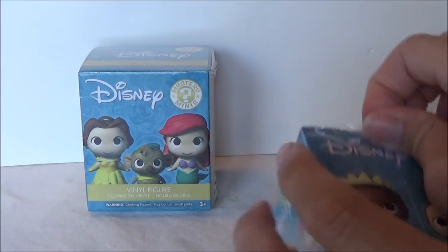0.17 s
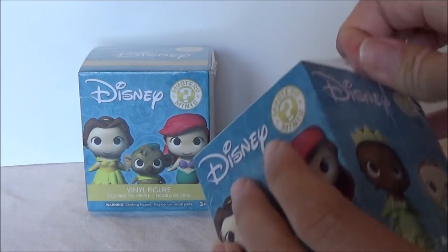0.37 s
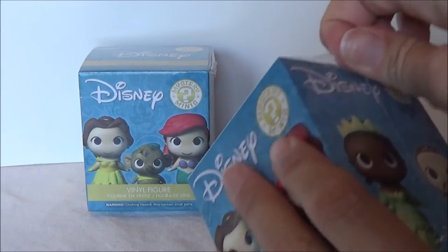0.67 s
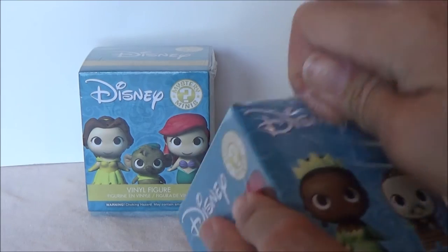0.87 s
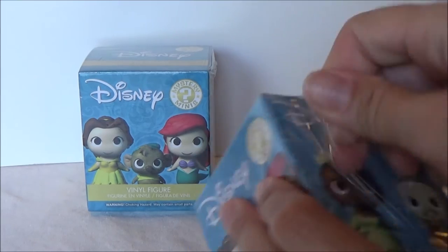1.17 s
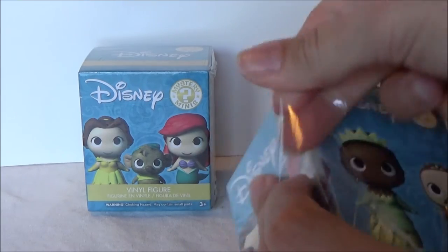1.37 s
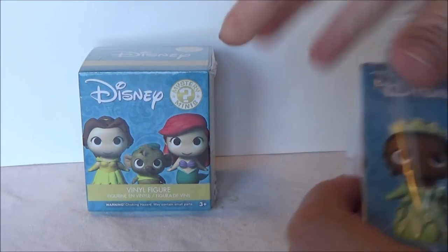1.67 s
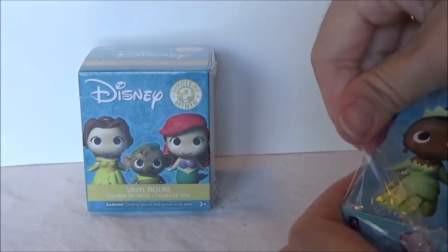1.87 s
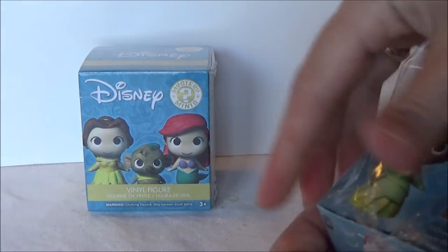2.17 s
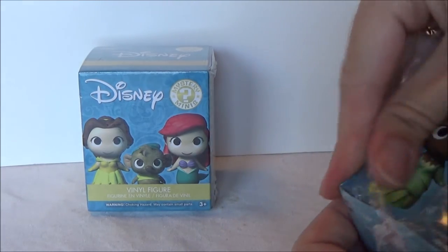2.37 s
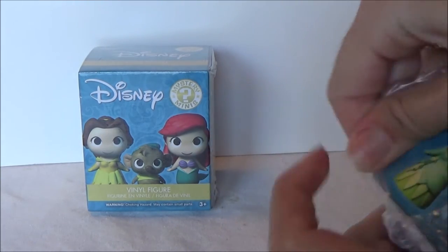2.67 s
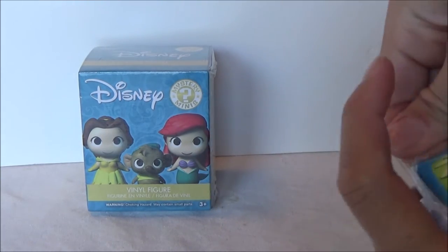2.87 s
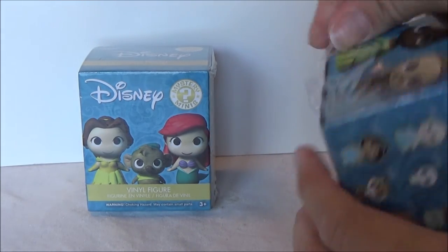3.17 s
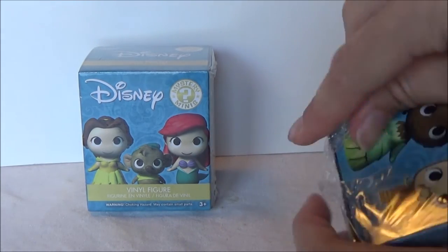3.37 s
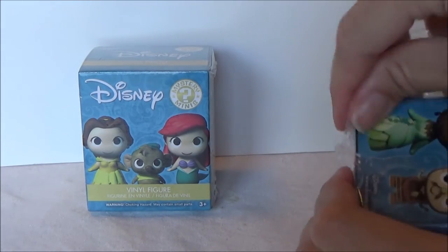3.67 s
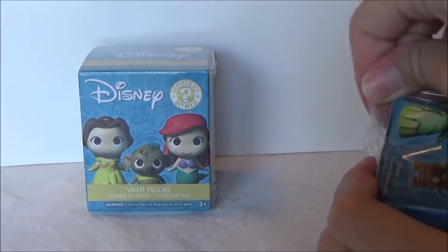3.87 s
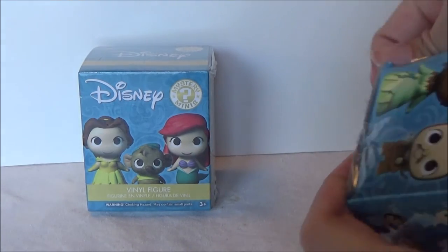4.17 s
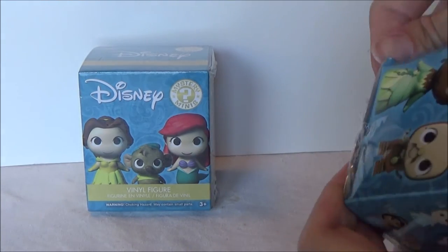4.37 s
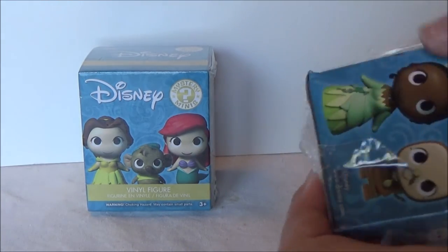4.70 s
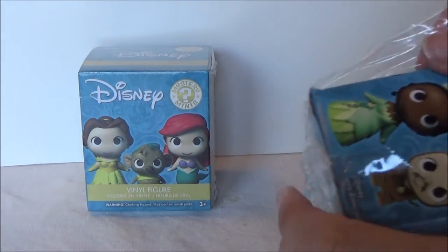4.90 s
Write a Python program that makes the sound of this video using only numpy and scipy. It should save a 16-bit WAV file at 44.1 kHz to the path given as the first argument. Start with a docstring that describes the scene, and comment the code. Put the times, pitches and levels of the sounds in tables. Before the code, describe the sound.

Close-up unwrapping: quiet fumbling and small squeaky scrapes first, then continual bright snaps and crinkles as plastic wrap is tugged, with tiny pauses between pulls. The light cardboard box pops and thumps hollowly now and then. Crackles stay busy and grow slightly stronger toward the end. Mostly dry sound, slightly right of centre, in a small still room with barely audible background hush.

```python
"""Peeling shrink wrap off a small box

Hands peel and crumple thin shrink wrap off a small cardboard box on a table, heard close by.
Each pull buckles creases: single sharp snaps are short noise bursts filtered at the pitch of the fold,
over a crackle of tiny ones made of noise with a random grain envelope.
The hollow box knocks as decaying tones and rubs as low grains; a few finger scrapes are rising hoarse tones.
The table top adds an early reflection, a small room adds a decaying noise tail, and faint hush lies below.
"""
import sys
import numpy as np
from scipy import signal
from scipy.fft import rfft, irfft, next_fast_len
from scipy.io import wavfile
from scipy.ndimage import uniform_filter1d, map_coordinates

SR = 44100
rng = np.random.default_rng(int(sys.argv[2]) if len(sys.argv) > 2 else 0)


def materialize(psi):
    """Save the field psi as 16-bit PCM at rate SR to the path in sys.argv[1].

    A 1-D psi becomes a single channel; in a 2-D psi each row is a channel.
    """
    bounded = np.clip(np.atleast_2d(psi).T, -1, 1)
    quanta = np.round(bounded * 32767).astype(np.int16)
    wavfile.write(sys.argv[1], SR, quanta)


N = 222296  # samples, about 5 s


def amp(db):
    """Level to amplitude: 20 dB are a factor of ten."""
    return 10 ** (np.asarray(db) / 20)


def unit(x):
    """Normalisation to an rms of 1."""
    return x / np.sqrt(np.mean(x ** 2) + 1e-20)


def along(points, hz):
    """Interpolation of (f/Hz, value) points on a logarithmic frequency axis."""
    f, v = np.transpose(points)
    return np.interp(np.log(hz + 1), np.log(f), v)


def filtered(x, response):
    """Linear filtering: the spectrum is multiplied by a response of frequency."""
    m = next_fast_len(N + SR // 2)
    spectrum = rfft(x, m) * response(np.fft.rfftfreq(m, 1 / SR))
    return irfft(spectrum, m)[..., :N]


def coloured(x, points):
    """Spectral shaping by (f/Hz, level/dB) points."""
    return filtered(x, lambda hz: amp(along(points, hz)))


def band_noise_filter(order, low_hz, high_hz):
    """Butterworth band-pass: maximally flat between two cutoffs, the upper kept below half the sample rate."""
    return signal.butter(order, [low_hz, min(high_hz, .45 * SR)], 'bandpass', fs=SR, output='sos')


def add(track, s, sound):
    """Superposition of a sound on a track from time s."""
    start = max(round(s * SR), 0)
    part = track[..., start:start + sound.shape[-1]]
    part += sound[..., :part.shape[-1]]


# difference between the two close microphone ports: f/Hz, gain of the side signal level/dB
PORT_WIDTH = [(200, -24.5), (600, -17), (1200, -13), (4000, -10), (9000, -8), (14000, -18.5)]


def ports(mid, side):
    """Spatial coherence: long waves reach both ports alike, short ones differ."""
    side = coloured(side, PORT_WIDTH)
    return np.array([mid + side, mid - side])


# typical time for the flutter to peak/ms, its scatter/natural log
FLUTTER_MS, FLUTTER_SCATTER = 0.52, 0.27
# creases whose snaps stand out from the crackle around them:
# t/s, relative level/dB, pitch of the fold f/Hz, treble sparkle over the fold level/dB
DISTINCT_CREASES = [(0.069, -21.5, 4600, 20), (0.2755, -25, 1870, -10), (0.3153, -19.5, 4500, 9),
                    (0.383, -23.5, 4340, -1.5), (0.5506, -28.5, 4030, 2), (0.5946, -24.5, 3820, 4),
                    (0.6271, -27.5, 4300, 0.5), (0.6394, -14, 4000, 8.5), (0.6791, -14, 4100, 9),
                    (0.7351, -16, 2480, 2), (0.8242, -32.5, 4100, 10.5), (0.8532, -10.5, 3400, 2.5),
                    (0.8666, -15.5, 3800, -1), (0.8967, -14.5, 4800, 3), (0.9268, -15.5, 3400, 17),
                    (0.9587, -16, 2800, 9.5), (0.9982, -18, 5050, 9), (1.095, -17.5, 4760, -6),
                    (1.1011, -16.5, 3900, 7), (1.1261, -11.5, 4100, -1.5), (1.1474, -11.5, 2850, 0),
                    (1.1663, -17, 3300, 9.5), (1.2071, -18, 2070, -7.5), (1.218, -10, 2130, -16),
                    (1.2254, -13.5, 2400, 8.5), (1.2472, -14, 2300, 23), (1.2648, -19, 3400, 8.5),
                    (1.3599, -19, 3300, 11.5), (1.4444, -19.5, 4530, 9), (1.461, -12, 2930, 10),
                    (1.477, -17.5, 3900, 5.5), (1.504, -16, 4370, 1), (1.5511, -19, 3660, -1.5),
                    (1.5585, -22.5, 3600, 12.5), (1.5856, -21.5, 3730, -10.5), (1.6143, -12.5, 4050, 2),
                    (1.637, -18.5, 3690, 0), (1.6408, -19, 4100, 6.5), (1.6813, -21, 3400, 9.5),
                    (1.723, -16.5, 4800, 3), (1.748, -21, 3340, -11), (1.7788, -15, 4430, -5),
                    (1.8333, -20, 5030, -3), (1.8414, -17.5, 4400, -0.5), (1.8609, -17.5, 4520, 6),
                    (1.8752, -11.5, 4200, 11), (1.9402, -15.5, 4300, 10.5), (2.0047, -17.5, 3900, 3.5),
                    (2.1051, -12.5, 4240, -2.5), (2.109, -11.5, 2850, 18), (2.158, -16.5, 3730, 24),
                    (2.1781, -15.5, 4760, 13.5), (2.2206, -21.5, 3780, -11.5), (2.3561, -18, 4720, 12.5),
                    (2.3751, -12, 4400, 4), (2.4283, -14.5, 4930, 8), (2.4543, -19.5, 2960, 7),
                    (2.4703, -14.5, 4400, 13), (2.4759, -17.5, 4500, 3.5), (2.5045, -13.5, 4600, 13.5),
                    (2.5088, -16.5, 4900, 6), (2.5702, -14, 2900, 11), (2.586, -17.5, 4240, 6.5),
                    (2.6413, -11.5, 5320, 21), (2.658, -20.5, 4600, 5), (2.7086, -15, 3850, 8.5),
                    (2.7221, -17.5, 4270, 5), (2.809, -21, 3500, 11), (2.8503, -18.5, 5130, 11.5),
                    (2.8686, -15, 2750, 10), (2.9185, -19.5, 3600, -11.5), (2.9329, -21.5, 3930, -1.5),
                    (2.9444, -18, 3900, 23.5), (2.9679, -14.5, 3740, 5.5), (2.9752, -14, 3860, 4.5),
                    (3.0216, -16, 3800, 17), (3.0311, -13, 3520, 8.5), (3.075, -16.5, 1900, 3),
                    (3.125, -12.5, 4000, 19.5), (3.1642, -12.5, 4600, 13), (3.2283, -24.5, 1550, -17.5),
                    (3.2982, -15.5, 5270, 23.5), (3.3492, -18, 2300, 2), (3.3806, -15.5, 5000, 8),
                    (3.3903, -13, 5100, 36.5), (3.4604, -12, 3300, 13.5), (3.5197, -14, 4140, 5),
                    (3.5388, -13, 3090, -2), (3.5572, -18.5, 2780, -2), (3.6163, -21, 5500, 12.5),
                    (3.6553, -20.5, 2300, 10), (3.7022, -18.5, 4080, 7), (3.7077, -21, 4400, 20.5),
                    (3.733, -16, 3320, 9), (3.7637, -16.5, 2600, 4.5), (3.7703, -19, 3340, 10),
                    (3.7966, -16, 2540, -9), (3.8394, -13, 4500, 15), (3.8535, -17, 3800, 8.5),
                    (3.8758, -14.5, 3580, 4.5), (4.005, -21.5, 3960, 10), (4.0698, -19, 1790, -7),
                    (4.0969, -19, 2780, -11), (4.1086, -13, 4520, 10), (4.2164, -14.5, 2360, -3.5),
                    (4.2827, -13, 3500, 2.5), (4.2934, -16.5, 4130, 2.5), (4.3301, -15, 4680, 19.5),
                    (4.3423, -12.5, 3370, -5), (4.41, -16, 4530, -2), (4.4417, -12.5, 3800, 0.5),
                    (4.4458, -18, 2700, -8), (4.5339, -15.5, 4270, 3), (4.5694, -17.5, 1440, -20),
                    (4.6023, -15.5, 5400, 10), (4.7001, -11, 4540, 7), (4.7346, -11, 3830, -8),
                    (4.7562, -8.5, 4670, 14), (4.786, -13.5, 4300, 30), (4.8263, -12.5, 3380, 10),
                    (4.9429, -13, 3700, 4), (4.9737, -20, 5500, 11), (5.01, -22, 3200, 8),
                    (5.02, -17.5, 1880, 8), (5.032, -14.5, 1740, -10.5)]


def snaps(creases, jump, click_s, flutter_db, table_s, table_db, spread_db,
          fold_below, fold_above, sparkle_hz, top_hz, dull_db):
    """Snap-through buckling: a crease flips in a fraction of a ms, film flutters, the table top reflects."""
    t = np.arange(SR // 80) / SR
    treble = band_noise_filter(2, sparkle_hz, top_hz)
    sheet = band_noise_filter(1, 1400, 2700)
    out = np.zeros((2, N))
    for s, db, hz, sparkle_db in creases:
        height, place, strength, slack = rng.standard_normal(4)
        flutter_ms = FLUTTER_MS * np.exp(FLUTTER_SCATTER * slack)
        age = t / (flutter_ms / 1000)
        click = np.exp(-t / click_s)
        flutter = amp(flutter_db) * age * np.exp(1 - age)
        flip = (click + flutter) * rng.standard_normal(len(t))
        # the crease itself jumps inward or outward in one step
        flip[1] += jump * rng.choice([-1, 1])
        heard = flip.copy()
        reflection_db = min(table_db + 2 * strength, -4)
        add(heard, table_s * np.exp(.2 * height), amp(reflection_db) * flip)
        # the fold rings for a cycle or two at its own pitch, the whole sheet adds a dull click
        fold = band_noise_filter(2, hz * np.exp(-fold_below), hz * np.exp(fold_above))
        parts = np.array([unit(signal.sosfilt(band, heard)) for band in (fold, treble, sheet)])
        snap = unit(amp([0, sparkle_db, dull_db]) @ parts)
        left_right_db = spread_db * place * np.array([[1], [-1]])
        add(out, s, amp(db + left_right_db) * snap)
    return out


# lesser creases: level over the pull/dB, ceiling before scatter/dB, scatter/dB
LESSER_DB, LESSER_TOP_DB, LESSER_SCATTER_DB = 13, -20.5, 1.5
# their typical fold pitch f/Hz, its scatter/natural log; sparkle over the pull's own fizz/dB, its scatter/dB
LESSER_HZ, LESSER_HZ_SCATTER, SPARKLE_DB, SPARKLE_SCATTER_DB = 3770, 0.48, 6.5, 3.5
# below this crumple level/dB the fingers only rub and hardly a crease gives way
YIELD_DB = -37


def lesser_snaps(crumple, fizz, count, crowding):
    """Yielding under load: the harder the pull, the more often and louder small creases give way."""
    force = np.hypot(crumple, fizz)
    yielding = 1 / (1 + (amp(YIELD_DB) / crumple) ** 4)
    strain = np.cumsum(force ** crowding * yielding)
    # random moments, one in each equal share of the strain
    at = np.searchsorted(strain / strain[-1], (np.arange(count) + rng.random(count)) / count)
    size, pitch, sparkle = np.clip(rng.standard_normal((count, 3)), -2, 2).T
    db = np.minimum(20 * np.log10(force[at]) + LESSER_DB, LESSER_TOP_DB) + LESSER_SCATTER_DB * size
    hz = LESSER_HZ * np.exp(LESSER_HZ_SCATTER * pitch)
    sparkle_db = 20 * np.log10(fizz[at] / crumple[at]) + SPARKLE_DB + SPARKLE_SCATTER_DB * sparkle
    return np.column_stack([at / SR, db, hz, sparkle_db])


# pulls of the fingers on the film: t/s, build-up t/s, hold t/s, relative crumple level/dB,
# fizz over the crumple level/dB, box rub over the crumple level/dB
FINGER_PULLS = [(-0.029, 0.064, 0.0067, -36.5, -5.5, 4.5), (0.057, 0.023, 0.046, -36, 3.5, 2),
                (0.197, 0.089, 0.02, -40, -11, 9), (0.355, 0.0072, 0.017, -43.5, -8, 7),
                (0.525, 0.017, 0.04, -45, -5.5, 7), (0.61, 0.063, 0.005, -39, -1.5, 2),
                (0.852, 0.0046, 0.035, -26, -2, 2.5), (0.901, 0.013, 0.015, -32, -2, -9),
                (0.959, 0.006, 0.016, -46, 0, 1), (1.075, 0.062, 0.026, -33, -1, -2),
                (1.206, 0.004, 0.005, -26, -2, -2), (1.239, 0.021, 0.1, -36, 5, -6.5),
                (1.412, 0.068, 0.075, -35, 2, -8.5), (1.605, 0.0046, 0.007, -31, 0, 0),
                (1.7, 0.014, 0.046, -33, -7, 1), (1.751, 0.028, 0.0046, -26, -2, 0),
                (1.847, 0.02, 0.047, -32.5, 0, -12), (1.948, 0.021, 0.05, -40, 0.5, -0.5),
                (2.056, 0.07, 0.01, -31, 5, -2), (2.151, 0.034, 0.121, -37, -2, -2),
                (2.318, 0.045, 0.0062, -28, 0, -4), (2.402, 0.069, 0.0046, -35, 2.5, -2.5),
                (2.481, 0.018, 0.076, -38, 5.5, 4.5), (2.612, 0.017, 0.119, -41, 3, 3.5),
                (2.765, 0.076, 0.075, -41, -2.5, -9.5), (2.959, 0.066, 0.008, -27, 0.5, 2.5),
                (3.046, 0.024, 0.047, -35.5, 2.5, 4), (3.154, 0.058, 0.0066, -35.5, -12, 7.5),
                (3.281, 0.1, 0.011, -37, 1, -2.5), (3.406, 0.031, 0.01, -31.5, 0.5, -2),
                (3.475, 0.047, 0.039, -30, -1.5, -5.5), (3.63, 0.025, 0.026, -36.5, -3.5, 2.5),
                (3.722, 0.018, 0.006, -27, -2.5, -4.5), (3.858, 0.034, 0.03, -29, 5, -12),
                (3.959, 0.021, 0.083, -35, 1, 2.5), (4.093, 0.029, 0.042, -31, 3.5, -5.5),
                (4.153, 0.096, 0.035, -27, -1, -2.5), (4.394, 0.047, 0.005, -25.5, 0, -1.5),
                (4.466, 0.041, 0.069, -32, 0, 0), (4.686, 0.043, 0.082, -34, 3, 6),
                (4.813, 0.022, 0.085, -41.5, -7, 9), (4.933, 0.007, 0.033, -38, 1, 1.5),
                (5.002, 0.025, 0.01, -26.5, 1, -1)]
# loosened film and box settling on: crumple, fizz and box rub, each under its pull level/dB
SETTLING = [-10, -10, -6.5]
# merely held film and box: crumple, fizz and box rub, each relative level/dB
HELD = [-57, -62, -55]
# fall once the fingers let go, and the slower fading of the settling/(dB per s)
RELEASE_DB_PER_S, SETTLE_DB_PER_S = 232, 68
# tiny creases around each distinct snap: level under it/dB, swell before and fading after it/(dB per s)
STRAIN_DB, STRAIN_SWELL_DB_PER_S, STRAIN_FADE_DB_PER_S = -21, 1299, 602


def pulling():
    """Loading and relaxation: crumple, fizz and rub amplitudes build, hold, let go; snaps add strain."""
    t = np.arange(0, N + SR // 500, SR // 1000) / SR
    power = np.outer(amp(HELD) ** 2, np.ones(len(t)))
    for s, build, hold, db, fizz_db, rub_db in FINGER_PULLS:
        after = np.maximum(t - s - build - hold, 0)
        settle_db = np.c_[SETTLING] - SETTLE_DB_PER_S * after
        fall_db = np.maximum(-RELEASE_DB_PER_S * after, settle_db)
        force = np.clip((t - s) / build, 0, 1) * amp(fall_db)
        power += (amp(db + np.c_[[0, fizz_db, rub_db]]) * force) ** 2
    for s, db, _, sparkle_db in DISTINCT_CREASES:
        slope_db = np.minimum(STRAIN_SWELL_DB_PER_S * (t - s), STRAIN_FADE_DB_PER_S * (s - t))
        strain = amp(db + STRAIN_DB + slope_db)
        colour = amp([0, sparkle_db])
        # only crumple and fizz strain
        power[:2] += np.outer(colour / np.linalg.norm(colour), strain) ** 2
    return [np.interp(np.arange(N) / SR, t, level) for level in np.sqrt(power)]


def buckling(rate, scatter_db, life_s):
    """Shot noise: energy of many tiny creases flipping at random moments, levelled by its local mean."""
    sizes = amp(2 * scatter_db * np.clip(rng.standard_normal(N), -2, 2))
    flips = sizes * (rng.random(N) < rate / SR)
    energy = signal.lfilter([1], [1, -np.exp(-1 / (life_s * SR))], flips)
    # second smoothing: each grain has a short soft rise
    energy = signal.lfilter([1], [1, -np.exp(-1 / (0.23 * life_s * SR))], energy)
    local_mean = np.abs(uniform_filter1d(energy, size=SR // 30))
    return energy / (local_mean + 0.07 * energy.mean())


def grains(energy, spectrum):
    """Modulated noise: stereo grains of rms 1 that follow an energy envelope."""
    mid, side = np.sqrt(energy) * rng.standard_normal((2, N))
    return unit(coloured(ports(mid, side), spectrum))


# hollow box: f/Hz, relative spectral level/dB
BOX_SPECTRUM = [(30, -48), (100, -43), (180, -17.5), (300, -5.5), (450, -0.5), (600, 3), (740, 4.5),
                (950, 0.5), (1250, -12), (1800, -8), (4000, -61)]
# broad folds of the film: f/Hz, relative spectral level/dB
FOLD_SPECTRUM = [(400, -45), (900, -10.5), (1300, 7.5), (1600, 2.5), (2050, 8), (2600, 4.5), (3600, 3),
                 (4800, -1.5), (6000, -4.5), (9000, -34)]
# fine wrinkles of the film: f/Hz, relative spectral level/dB
WRINKLE_SPECTRUM = [(2500, -12.5), (4300, -20.5), (5400, -8.5), (7500, -3), (9400, 2.5), (10600, 1.5),
                    (11800, 7.5), (13500, 2), (15500, 4), (17000, -53)]


def handling(crumple, fizz, rub, slide, rub_db, crumple_db, fizz_db):
    """Crackling noise: folds and wrinkles buckle over sliding friction; a harder pull packs them into a hiss."""
    pull = unit(fizz) ** .6
    # grain rates per second, shared grains sounding in all three spectra
    shared = buckling(rate=550 * (0.22 + pull), scatter_db=15.5, life_s=0.0017)
    folds = buckling(rate=350 * (.3 + pull), scatter_db=12, life_s=0.0016)
    wrinkles = buckling(rate=900 * (0.21 + pull), scatter_db=6, life_s=0.0004)
    box_rub = rub * grains(shared + folds + 2 * slide, BOX_SPECTRUM)
    crumpling = crumple * grains(shared + .5 * folds + slide * pull, FOLD_SPECTRUM)
    fizzing = fizz * grains(shared + .5 * wrinkles + slide * pull ** 2, WRINKLE_SPECTRUM)
    return amp(rub_db) * box_rub + amp(crumple_db) * crumpling + amp(fizz_db) * fizzing


# fingertips that drag on the taut film: t/s, length t/s, relative level/dB, first f/Hz, last f/Hz
FINGER_SCRAPES = [(0.0, 0.075, -27.5, 741, 1363), (0.271, 0.04, -29, 1727, 1870),
                  (0.372, 0.01, -30.5, 1354, 1630)]


def scrapes(hoarseness, overtone_db):
    """Stick-slip friction: uneven grip gives a hoarse tone that rises as the finger speeds up."""
    out = np.zeros(N)
    for s, length, db, first_hz, last_hz in FINGER_SCRAPES:
        u = np.linspace(0, 1, int(length * SR))
        phase = 2 * np.pi * np.cumsum(first_hz + (last_hz - first_hz) * u) / SR
        knots = int(hoarseness * first_hz * length)
        # three smooth random curves make the tone uneven
        grip = [map_coordinates(rng.standard_normal(knots + 3), [u * knots]) for _ in range(3)]
        tone = grip[0] * np.sin(phase) + grip[1] * np.cos(phase)
        tone += amp(overtone_db) * grip[2] * np.sin(2 * phase)
        add(out, s, amp(db) * unit(tone) * np.sin(np.pi * u ** 1.5))
    return np.array([out, out])


PANEL_RING_MS = 1.27  # decay to 1/e
# box panels that flex or are tapped: t/s, relative level/dB, pitch f/Hz, whole box's thump over the panel level/dB
PANEL_KNOCKS = [(0.0796, -28, 784, -31), (0.277, -31, 690, -18), (0.8529, -18, 680, -1),
                (0.8776, -24, 730, -10), (0.9155, -21.5, 630, -10), (1.1258, -27, 780, -23.5),
                (1.4605, -32, 755, -11), (1.551, -38.5, 710, 10), (1.774, -18.5, 670, 0),
                (1.7835, -18, 720, -17), (1.9667, -32.5, 628, -28.5), (2.1079, -26.5, 764, -29),
                (2.1462, -24.5, 650, -30.5), (2.249, -18, 625, -3.5), (2.47, -13, 490, 0.5),
                (2.5714, -25, 718, -11.5), (3.0779, -18, 853, -10), (3.1979, -28.5, 740, 8),
                (3.2278, -16, 674, -18), (3.4613, -27, 665, -11.5), (3.5408, -24, 740, -6.5),
                (3.6814, -31.5, 710, -20), (3.8597, -29, 696, -20.5), (3.9636, -28.5, 645, -30.5),
                (4.219, -20.5, 666, -23.5), (4.4367, -12.5, 668, -34.5), (4.5686, -23.5, 670, -7.5),
                (4.702, -28, 710, 2.5), (4.8519, -20.5, 674, -6.5), (4.942, -27.5, 785, -18),
                (5.0214, -23, 930, -21)]


def knocks(rise_s, upper_db, deep_hz, deep_db, rattle_s, rattle_db, low_hz, top_hz):
    """Damped plate vibration: a panel pops for a few cycles, the box thumps below it and shudders briefly."""
    t = np.arange(SR // 14) / SR
    out = np.zeros(N)
    for s, db, hz, depth_db in PANEL_KNOCKS:
        upper, deep = np.exp(0.089 * rng.standard_normal(2))
        panel = np.sin(2 * np.pi * hz * t)
        panel += amp(upper_db) * np.sin(2 * np.pi * 1.513 * upper * hz * t)
        panel *= np.exp(-1000 * t / PANEL_RING_MS) * (1 - np.exp(-t / rise_s))
        # gone in a few cycles
        thump = np.sin(2 * np.pi * deep_hz * deep * t) * t * np.exp(-1.6 * deep_hz * t)
        band = band_noise_filter(2, 0.73 * hz, 1.34 * hz)
        shudder = signal.sosfilt(band, rng.standard_normal(len(t)) * np.exp(-t / rattle_s))
        knock = unit(panel) + amp(deep_db + depth_db) * unit(thump) + amp(rattle_db) * unit(shudder)
        add(out, s, amp(db) * unit(knock))
    # so small a box radiates little bass, and soft cardboard little treble
    out = signal.sosfilt(signal.butter(2, low_hz, 'highpass', fs=SR, output='sos'), out)
    out = signal.sosfilt(signal.butter(4, top_hz, 'lowpass', fs=SR, output='sos'), out)
    return np.array([out, out])


# ringing of the box's panels and air: f/Hz, width f/Hz, relative level/dB
RING_MODES = [(265, 41, -5), (612, 14, 8.5), (660, 12, -6), (770, 6.6, 15.5), (1970, 30, 9),
              (3407, 13, -22.5)]


def box_ring(x):
    """Modal resonance: whatever shakes the box rings on briefly in its modes."""
    def response(f):
        """Sum of second-order resonances, each with its peak at the mode."""
        return sum(amp(db) * 1j * f * width / (hz * hz - f * f + 1j * f * width)
                   for hz, width, db in RING_MODES)
    return filtered(x, response)


# room decay: f/Hz, time to fall by 60 dB t/s
ROOM_DECAY = [(200, 0.22), (800, 0.11), (3000, 0.24), (14000, 0.13)]


def room(x, gap_s):
    """Reverberation: walls answer after a gap, with a fresh random tail every fifth of a second."""
    out = np.zeros((2, N))
    hop = SR // 5
    for start in range(0, N, hop):
        hz, t, z = signal.stft(rng.standard_normal((2, SR // 3)), SR, nperseg=256)
        decay = amp(-60 * t / along(ROOM_DECAY, hz)[:, None])
        tail = signal.istft(z * decay, SR, nperseg=256)[1]
        piece = x.mean(axis=0)[None, start:start + hop]
        answer = signal.fftconvolve(piece, tail / np.linalg.norm(tail[0]), axes=1)
        add(out, start / SR + gap_s, answer)
    return ports(*out)


# still room: f/Hz, relative spectral level/dB
HUSH_SPECTRUM = [(20, -12.5), (60, -13), (150, 1), (600, -10.5), (1500, 2), (5000, -19), (11000, -11.5),
                 (16000, -92)]


def still_room():
    """Stationary background noise: a steady hush of rms 1."""
    return grains(np.ones(N), HUSH_SPECTRUM)


# balance of the two ports: f/Hz, left minus right level/dB
PORT_BALANCE = [(250, 0), (600, 0.28), (1100, -1.2), (2200, -1.9), (4500, -1.9), (12000, -1.2)]


def scene():
    """Superposition: film and box just right of centre, in a quiet small room."""
    crumple, fizz, rub = pulling()
    lesser = lesser_snaps(crumple, fizz, count=130, crowding=.5)
    creases = np.vstack([DISTINCT_CREASES, lesser])
    film = amp(-6.5) * snaps(creases, jump=1.82, click_s=0.00014, flutter_db=-10,
                             table_s=.0015, table_db=-14.5, spread_db=1.64, fold_below=0.39,
                             fold_above=0.18, sparkle_hz=8050, top_hz=13950, dull_db=-2.0)
    crackle = handling(crumple, fizz, rub, slide=0.15, rub_db=2, crumple_db=1, fizz_db=2.0)
    crackle += scrapes(hoarseness=0.54, overtone_db=-8.5)
    box = amp(-4.5) * knocks(rise_s=0.0071, upper_db=-25, deep_hz=339, deep_db=0.0,
                             rattle_s=0.006, rattle_db=-2, low_hz=151, top_hz=1430)
    ring = amp(-12.5) * box_ring(film + .5 * box + crackle)
    walls = room(amp(-14.0) * film + amp(-10.5) * box + amp(-12) * crackle, gap_s=0.0046)
    hush = amp(-49) * still_room()
    total = film + box + crackle + ring + walls + hush
    # half of the balance goes to each side
    return filtered(total, lambda hz: amp(np.outer([.5, -.5], along(PORT_BALANCE, hz))))


# microphone colour: f/Hz, gain level/dB
MICROPHONE_COLOUR = [(100, -6.5), (3000, -3), (5700, 2.5), (6300, 1.5), (6700, -3), (7300, 1), (8800, 1),
                     (12000, -3), (14000, -3.5), (15800, -7.5)]
TOP_HZ = 16000  # band limit


def record(dry):
    """Transducer response: the microphone has a treble notch, rounds the tallest peaks and is band-limited."""
    x = coloured(dry, MICROPHONE_COLOUR)
    x = x / (1 + np.abs(x / .95) ** 6) ** (1 / 6)
    return filtered(x, lambda hz: 1 / (1 + (hz / TOP_HZ) ** 120))


dry = scene()
out = record(dry)
materialize(out)
```